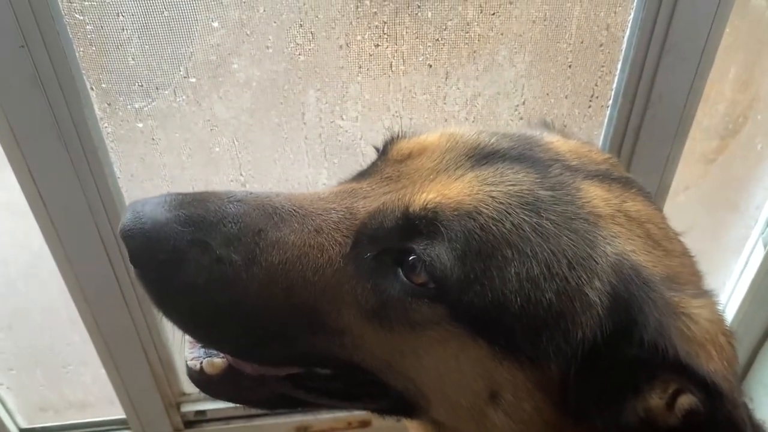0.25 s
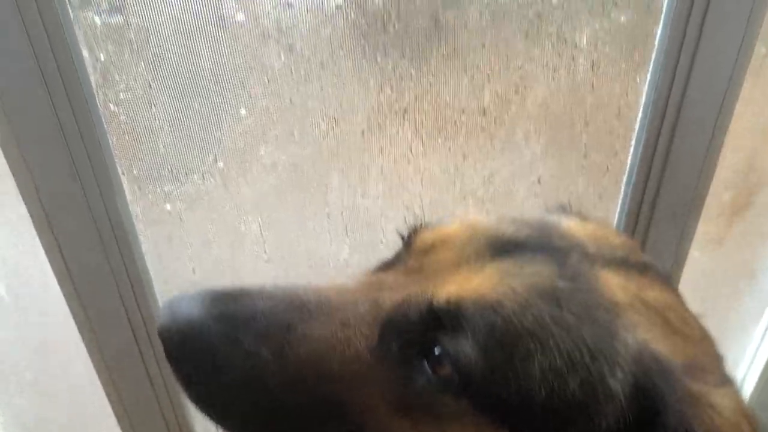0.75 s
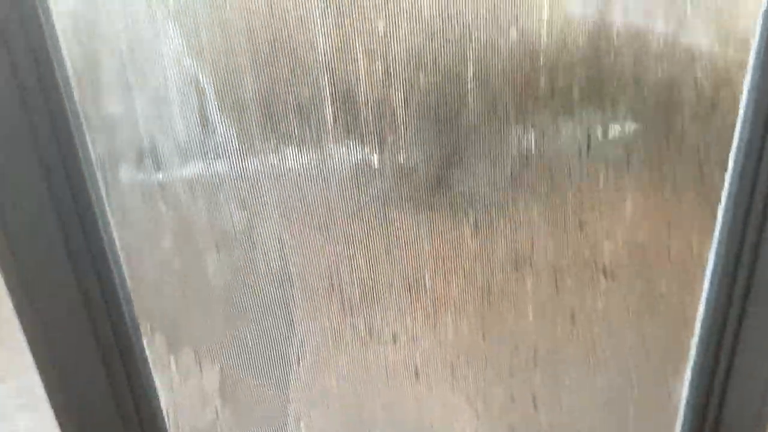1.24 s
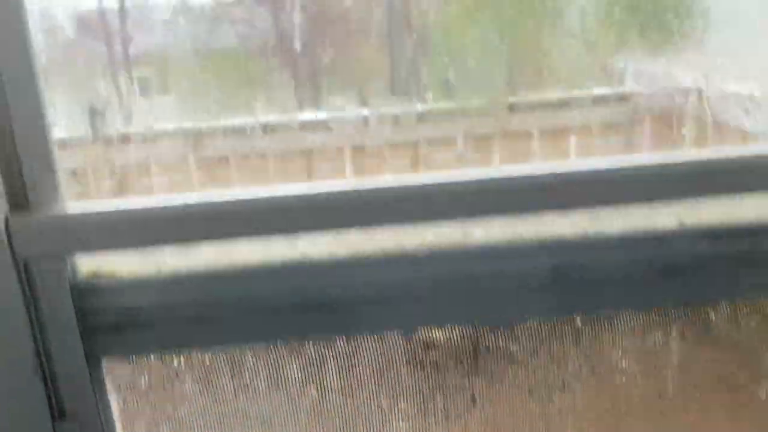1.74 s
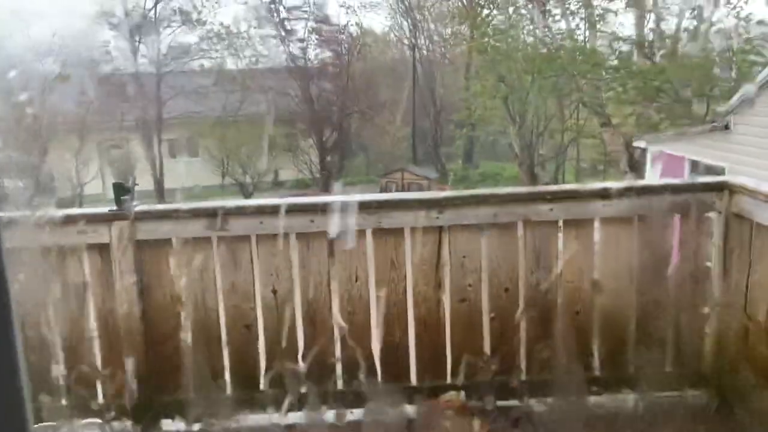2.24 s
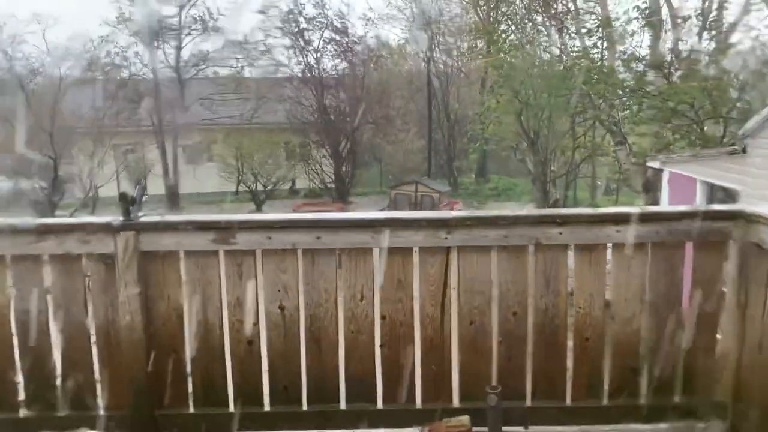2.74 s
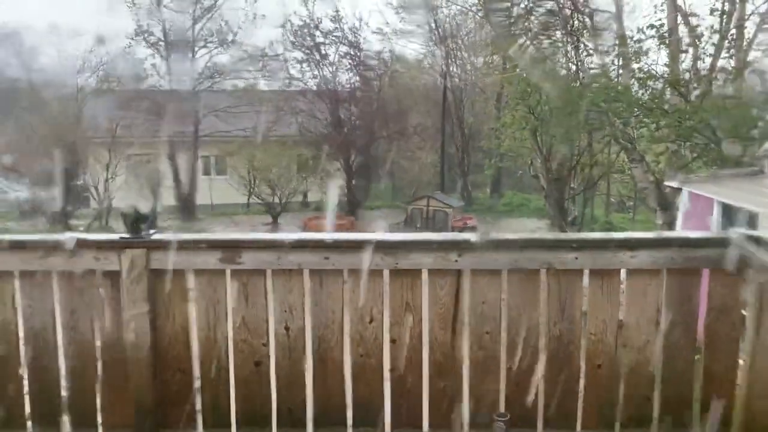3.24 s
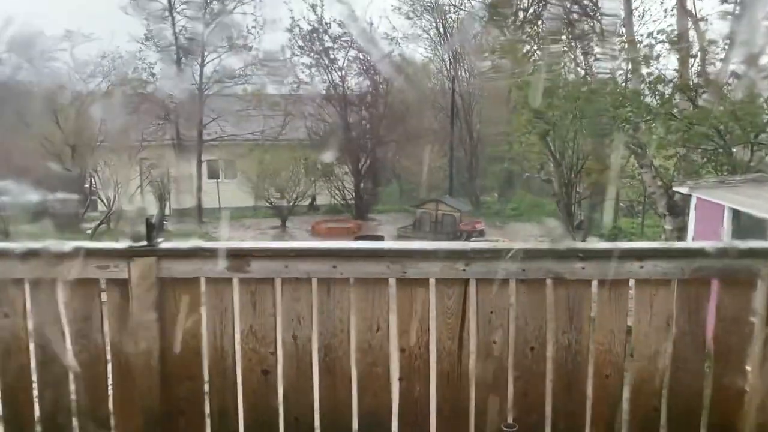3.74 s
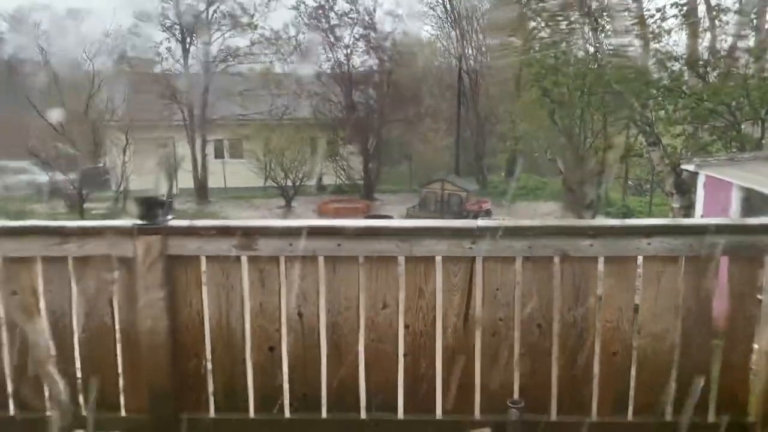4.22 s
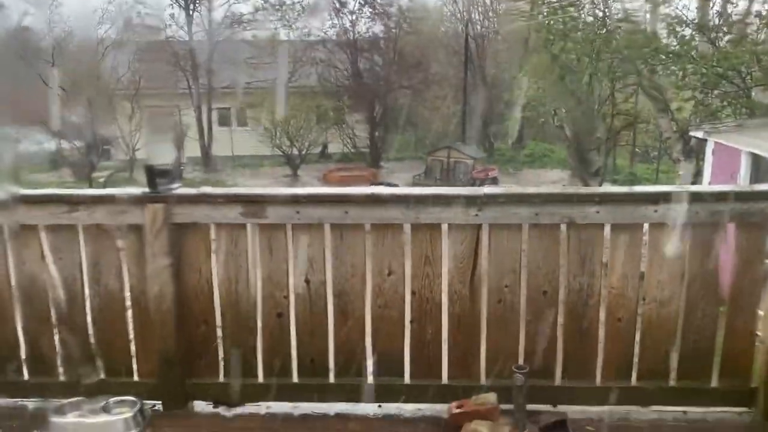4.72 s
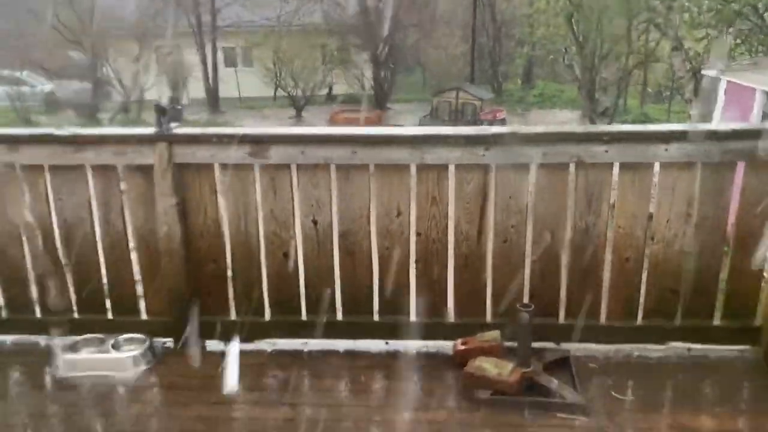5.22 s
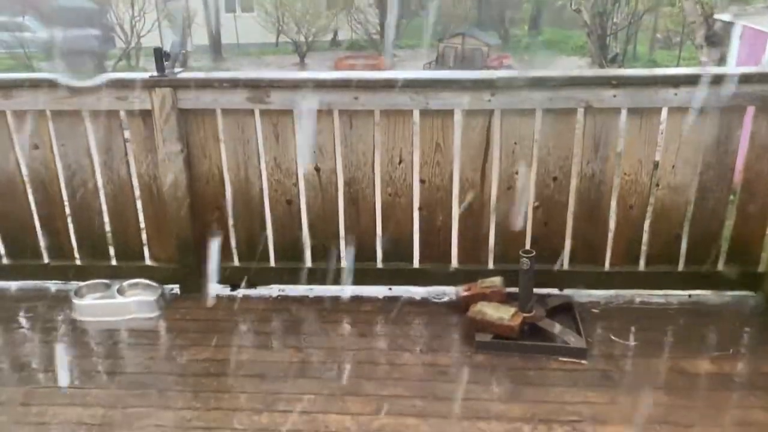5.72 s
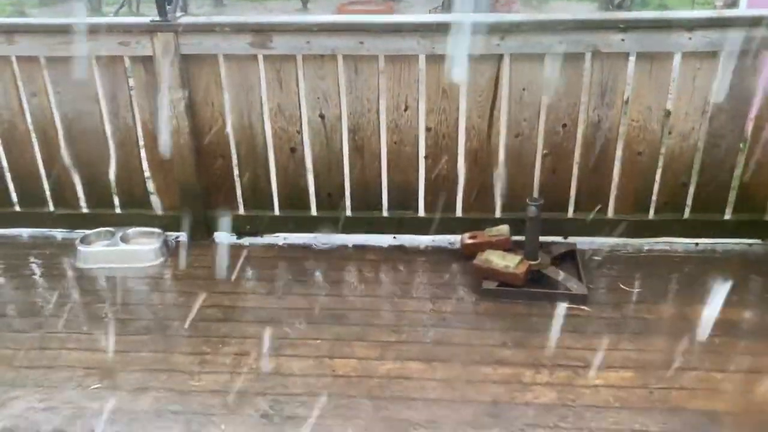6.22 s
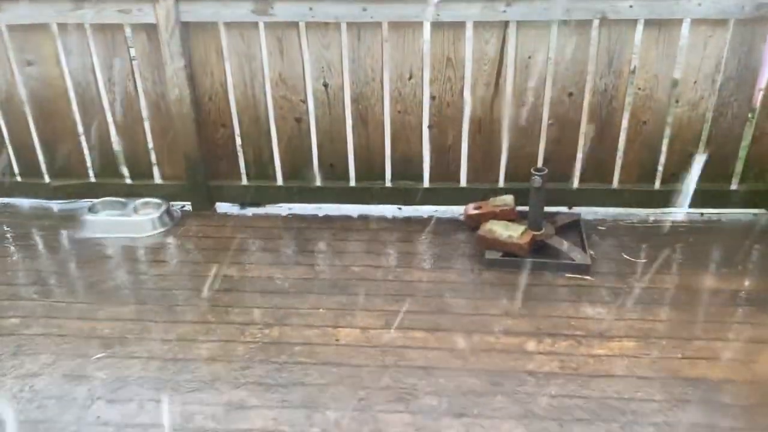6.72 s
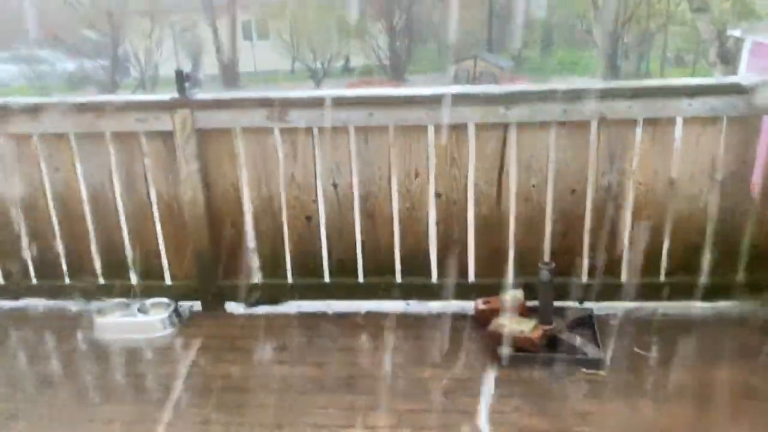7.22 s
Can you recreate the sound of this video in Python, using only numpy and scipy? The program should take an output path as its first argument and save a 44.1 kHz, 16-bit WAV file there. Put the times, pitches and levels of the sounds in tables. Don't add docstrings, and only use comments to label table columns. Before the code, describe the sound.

A heavy downpour runs throughout, a broad wet hiss with fine patter above low drumming on roof and boards, heard in stereo from a small porch room behind a screen door. At 0 s a hailstone hits close with a bright double click and icy crack. Until 2 s hail is sparse: light ticks, with snaps near 1.2 and 1.45. The rain swells around 2 s, with dull board knocks at 2.0 and 2.3 and a cluster of pellet ticks from 2.3 to 2.7. Hard raps land at 3.1 and 3.7; a faint low gust thump comes at 4.1. From 4.8 the rain is stronger and hail denser. The strongest soft thump falls at 5.5, beside a sharp crack; another crack and shorter thump follow at 6.1. A hollow wooden knock and low thump sound at 6.75, then two knocks at 7.25 and 7.34, rain still pouring at the end.

```python
import sys
import numpy as np
from scipy import signal
from scipy.fft import rfft, irfft, next_fast_len
from scipy.io import wavfile
from scipy.ndimage import uniform_filter1d, map_coordinates

SR = 44100
rng = np.random.default_rng(int(sys.argv[2]) if len(sys.argv) > 2 else 0)


def rack_gain(trim_db):
    fader = np.asarray(trim_db, float)
    return 10 ** (fader / 20)


def transcribe(u):
    v = np.clip(np.atleast_2d(u).T, -1, 1)
    q = np.round(v * 32767).astype(np.int16)
    wavfile.write(sys.argv[1], SR, q)


N = 328986

# frequency [Hz], density [dB per Hz].
HISS_SPECTRUM = [(400, -39), (700, 3.5), (1500, -2.5), (2500, 0), (5000, -6.5), (5900, -6.5), (6500, -4),
                 (7900, -2.5), (9000, -8.5), (10300, -10.5), (12300, -13), (14300, -18.5), (15700, -29),
                 (16400, -30)]
# start [s], tick level [dB], pitch [Hz].
PLANK_STONES = [(0.3517, -25, 2980), (0.786, -21, 4050), (2.1008, -19, 4570), (2.3792, -25.5, 4920),
                (2.4764, -22, 3180), (2.6, -26, 2640), (2.8545, -23.5, 2300), (3.0835, -25.5, 3700),
                (3.1772, -19, 4940), (3.2149, -17.5, 3630), (4.0678, -25.5, 2090), (4.1491, -19, 3900),
                (4.7855, -21.5, 2430), (4.7988, -20, 4050), (5.2042, -20, 4400), (5.2839, -17, 3040),
                (5.4527, -25, 4350), (5.671, -19, 3900), (5.7897, -18, 4200), (5.8805, -24, 2600),
                (5.9879, -20, 4500), (6.181, -17.5, 3480), (6.2833, -22, 4700), (6.6729, -22.5, 4100),
                (6.9288, -24, 4660), (7.0257, -24, 3600), (7.1222, -18, 2520), (7.141, -20.5, 2410),
                (7.2093, -23, 3400)]


def downpour():
    # frequency [Hz], density [dB per Hz].
    roof_spectrum = [(15, -40), (25, -21), (37, -12), (54, 2.5), (86, -6.5), (113, -1.5), (170, -12),
                     (220, -19.5), (370, -120)]
    # frequency [Hz], density [dB per Hz].
    deck_spectrum = [(76, -13.5), (130, -6), (248, -7.5), (317, -7), (355, -3.5), (388, -10.5), (420, -3),
                     (460, -11.5), (563, -8.5), (830, -28.5), (900, -19), (1170, -17), (1980, -120)]
    # time [s], level [dB].
    rain_rows = [(0.0, -39), (0.33, -41.5), (1.02, -38.5), (1.76, -38.5), (2.2, -36), (3.28, -37),
                 (3.68, -38.5), (4.84, -34), (5.15, -35.5), (5.53, -33.5), (6.09, -36), (6.25, -35),
                 (7.04, -35), (7.46, -34)]
    # time [s], level [dB].
    wind_rows = [(0.0, -35), (0.27, -39), (1.02, -36), (1.93, -37.5), (2.41, -34), (2.89, -37),
                 (3.76, -33.5), (3.93, -34.5), (5.21, -34), (5.42, -31), (5.77, -35.5), (6.23, -34),
                 (7.17, -35.5), (7.46, -33)]
    t = np.arange(N) / SR
    rain_db = np.interp(t, *np.transpose(rain_rows))
    wind_db = np.interp(t, *np.transpose(wind_rows))
    mean_rain_db = rain_db.mean()
    rain_swing_db = rain_db - mean_rain_db
    wind_swing_db = wind_db - wind_db.mean()

    roof_db = 2 + wind_db + 0.76 * wobble(5.7)
    deck_db = -32 + 0.5 * rain_swing_db + 0.3 * wind_swing_db + 0.46 * wobble(5)
    splash_db = 3 + mean_rain_db + 0.63 * rain_swing_db + 0.3 * wobble(6)
    spray_db = 2.5 + mean_rain_db + 0.82 * rain_swing_db + 1.1 * wobble(4.9)

    far_hiss = rush(HISS_SPECTRUM, patchy_db=2.5)
    hiss = far_hiss + rack_gain(-3.5) * patter(per_s=90, spread_db=4.5, t60_s=0.011)
    spray = filtered(hiss, lambda hz: np.clip((hz - 5500) / 1100, 0, 1))
    splash = hiss - spray
    roof = rush(roof_spectrum, patchy_db=0.15)
    deck = rush(deck_spectrum, patchy_db=1.0)
    return rack_gain(roof_db) * roof + rack_gain(deck_db) * deck + rack_gain(splash_db) * splash + rack_gain(spray_db) * spray


def rush(spectrum, patchy_db):
    grid = signal.stft(rng.standard_normal((2, N)), nperseg=512)[2]
    patches = rng.standard_normal(grid.shape[1:])
    patches = uniform_filter1d(patches, size=8, axis=0)
    patches = uniform_filter1d(patches, size=6, axis=1)
    pair = signal.istft(grid * rack_gain(patchy_db * unit(patches)), nperseg=512)[1][:, :N]
    return unit(filtered(pair, lambda hz: rack_gain(along(spectrum, hz))))


def patter(per_s, spread_db, t60_s):
    centres_hz = [1000, 1700, 2600, 3800, 5200, 7500, 11000]
    wet = rush(HISS_SPECTRUM, patchy_db=2.5)
    t = np.arange(2048) / SR
    puff = (1 - np.exp(-t / 0.00031)) * rack_gain(-60 * t / t60_s)
    chance, size = rng.random((2, len(centres_hz), N))
    blows = (chance < per_s / SR) * rack_gain(-spread_db * np.log(size + 0.04))
    swells = unit(signal.fftconvolve(blows, puff[None], axes=1)[:, :N])
    out = np.zeros((2, N))
    for centre_hz, swell in zip(centres_hz, swells):
        band = filtered(wet, lambda hz: np.exp(-(np.log2((hz + 1) / centre_hz) / 0.53) ** 2))
        out += swell * band
    return out


def wobble(knots_per_s):
    knots = rng.standard_normal(int(N * knots_per_s / SR) + 4)
    return map_coordinates(knots, [np.arange(N) * knots_per_s / SR])


def hail():
    # start [s], peak level [dB], pitch [Hz], t60 [s].
    knock_rows = [(1.009, -31, 751, 0.06), (1.193, -30, 1760, 0.089), (1.45, -30, 1000, 0.06),
                  (1.999, -18, 557, 0.012), (2.273, -20.5, 790, 0.031), (2.344, -20, 610, 0.041),
                  (2.765, -30, 496, 0.11), (3.119, -15, 1585, 0.048), (3.123, -21.5, 563, 0.057),
                  (3.418, -27, 1870, 0.065), (3.672, -15.5, 2010, 0.043), (4.068, -27, 1760, 0.12),
                  (4.21, -28, 2550, 0.09), (5.296, -26, 2500, 0.11), (4.849, -27, 766, 0.094),
                  (5.565, -32, 570, 0.06), (6.283, -33, 606, 0.083), (6.509, -22.5, 870, 0.036),
                  (6.746, -18, 453, 0.073), (6.753, -17.5, 650, 0.095), (6.769, -48, 468, 0.06),
                  (7.25, -20, 756, 0.046), (7.336, -15, 786, 0.048),
                  (.001, -20, 346, 0.12), (3.123, -16.5, 1490, 0.054), (6.745, -25.5, 1766, 0.16),
                     (3.119, -24, 624, .06), (6.745, -20.5, 965, 0.092), (6.755, -23, 2290, 0.057),
                     (6.762, -22, 350, 0.14), (6.796, -21, 202, .08), (7.253, -21.5, 3020, 0.035),
                     (7.338, -38, 2900, 0.036), (7.399, -19, 5500, .02)]
    s, tick_db, hz, crack_db, t60_s = stones()
    ticks = strike(s, tick_db + 1, hz, 0.66, t60_s * 0.77, porch_t60_s=0.18, porch_db=-10, ring=1)
    on_plank = np.arange(len(s)) >= len(s) - len(PLANK_STONES)
    slap_db = tick_db - 3 * on_plank
    slaps = strike(s, slap_db, 2540, 1.94, t60_s * 0.79, porch_t60_s=0.11, porch_db=-6.5, ring=0)
    cracks = strike(s, crack_db + 5.5, 8000, 0.78, t60_s * 0.7, porch_t60_s=0.13, porch_db=-17, ring=0)
    s, db, hz, t60_s = np.transpose(knock_rows)
    knocks = strike(s, db - 0.6, hz, 0.4, t60_s, porch_t60_s=0.1, porch_db=-22, ring=0.85)
    return ticks + slaps + cracks + knocks + pellets(count=420)


def stones():
    # start [s], tick level [dB], tick pitch [Hz], ice crack level [dB].
    large_stones = [(.0005, -12, 2510, -29), (.0045, -11, 5100, -7.5), (0.0142, -25, 4030, -20),
                    (.3902, -30, 3250, -21.5), (.476, -24, 3650, -30), (1.145, -28, 2930, -26),
                    (1.1943, -20.5, 3500, -17.5), (1.4505, -16.5, 2600, -17), (1.4957, -25, 5900, -13),
                    (2.5084, -18, 3160, -30), (3.1182, -15.5, 4570, -17), (3.418, -18.5, 3400, -18),
                    (3.6725, -11.5, 4060, -36), (3.8554, -21.5, 5000, -31), (4.3844, -20, 2500, -20.5),
                    (4.443, -18.5, 3850, -15.5), (5.2108, -19.5, 3630, -22), (5.3876, -14, 3700, -46),
                    (5.512, -19, 4040, -26), (5.5662, -14, 2850, -9), (5.8407, -24, 3310, -18.5),
                    (6.0795, -16.5, 2440, -5.5), (6.32, -15, 3460, -16), (6.388, -22, 3580, -24),
                    (6.4617, -20, 3500, -22), (6.4683, -28, 3600, -18.5), (6.508, -23, 4560, -15),
                    (6.7038, -21, 4300, -23), (7.2515, -29, 2980, -16), (7.337, -22, 3240, -20.5)]
    # start [s], tick level [dB], pitch [Hz].
    glass_stones = [(.3378, -31, 4020), (0.6336, -25.5, 3800), (.9225, -36, 4030), (1.0203, -29, 2980),
                    (1.332, -54, 3150), (1.3817, -28, 2250), (1.6713, -28, 2540), (2.0, -25.5, 2270),
                    (2.3125, -26.5, 3230), (2.765, -21.5, 4220), (3.509, -38, 2690), (3.6432, -28, 3950),
                    (3.923, -31, 2070), (3.9925, -27.5, 4120), (4.1606, -25.5, 2470), (4.3047, -24.5, 4050),
                    (4.8593, -21, 2400), (5.0986, -26.5, 2220), (5.469, -29, 4080), (5.6452, -24, 3440),
                    (5.9176, -24.5, 4440), (6.2704, -27, 2140), (6.5167, -21, 2830), (6.5417, -26, 2640),
                    (6.5693, -24, 3630), (6.8193, -24.5, 3140), (7.1034, -46, 2210), (7.2346, -49, 2000),
                    (7.3987, -24.5, 4660)]
    large_t60_s, glass_t60_s, plank_t60_s = 0.018, 0.016, 0.014
    glass_crack_db, plank_crack_db = -2.5, -15
    rows = [(*row, large_t60_s) for row in large_stones]
    rows += [(s, db, hz, db + glass_crack_db, glass_t60_s) for s, db, hz in glass_stones]
    rows += [(s, db, hz, db + plank_crack_db, plank_t60_s) for s, db, hz in PLANK_STONES]
    s, tick_db, hz, crack_db, t60_s = np.transpose(rows)
    return s, tick_db, hz, crack_db, t60_s * np.exp(0.2 * rng.standard_normal(len(s)))


def strike(s, level_db, hz, octaves, t60_s, porch_t60_s, porch_db, ring):
    t = np.arange(6144) / SR
    centre_hz = np.reshape(hz, (-1, 1, 1))
    decay = rack_gain(-60 * t / np.clip(t60_s, 0.004, 0.3)[:, None])
    porch = (1 - np.exp(-t / 0.0037)) * rack_gain(porch_db - 60 * t / porch_t60_s)
    shape = (1 - np.exp(-t / 0.00061)) * decay + porch
    ring_shape = (1 - np.exp(-t / 0.00007)) * decay

    noise = rng.standard_normal((len(s), 2, len(t)))
    noise = filtered(noise, lambda f: np.exp(-(np.log2((f + 1) / centre_hz) / octaves) ** 4))
    tone = np.sin(2 * np.pi * centre_hz * t) * noise.std(axis=2, keepdims=True)
    bursts = noise * shape[:, None] + ring * tone * ring_shape[:, None]
    size = rack_gain(level_db) * np.linalg.norm(shape, axis=1) / np.linalg.norm(bursts[:, 0], axis=1)
    out = np.zeros((2, N + len(t)))
    for start_s, burst in zip(s, bursts * size[:, None, None]):
        out[:, round(start_s * SR):][:, :len(t)] += burst
    return out[:, :N]


def pellets(count):
    # start [s], peak level [dB], pitch [Hz].
    rail_rows = [(0.0867, -27, 3470), (0.1136, -20, 2730), (0.4479, -21, 3060), (0.7592, -23, 2930),
                 (2.0827, -21, 4470), (2.3321, -22, 3460), (2.3614, -17, 4950), (2.3885, -22, 3910),
                 (2.4054, -22, 3750), (2.5641, -20, 4310), (2.6155, -13.5, 4600), (2.6256, -24, 2580),
                 (2.6793, -17, 3670), (2.6973, -19, 3960), (2.7386, -23, 2610), (2.9382, -22, 3930),
                 (3.5912, -32, 3240), (4.0073, -29, 3850), (4.126, -20, 3900), (4.62, -16.5, 4010),
                 (5.2659, -19, 4130), (5.6989, -15, 3500), (6.2362, -18, 4780), (6.8907, -16, 3580),
                 (7.009, -17, 3920), (7.3612, -25, 4010), (7.439, -22, 3700)]
    size, pitch = rng.standard_normal((count, 2)).T
    s, db, hz = np.transpose(rail_rows)
    s = np.append(s, rng.random(count) * N / SR)
    db = np.append(db + 3.5, -30.5 + 1.5 * size)[:, None]
    hz = np.append(hz, 3900 * 2 ** (0.26 * pitch))[:, None]
    t = np.arange(768) / SR
    phase = 2 * np.pi * rng.random((len(s), 2))
    modes = np.sin(2 * np.pi * hz * t + phase[:, :1])
    modes += 0.6 * np.sin(2 * np.pi * 1.17 * hz * t + phase[:, 1:])
    decay = rack_gain(db - 60 * t * hz / 26)
    grains = decay * (1 - np.exp(-t / 0.00056)) * modes
    at = np.round(s * SR).astype(int)[:, None] + np.arange(len(t))
    mono = np.bincount(at.ravel(), grains.ravel(), N + len(t))[:N]
    return mono * [[1], [0.5]]


def thumps():
    # start [s], peak level [dB], pitch [Hz], t60 [s].
    gust_rows = [
        (4.142, -16.5, 72.4, 0.19),
        (5.489, -7, 67, 0.21),
        (6.066, -14, 117.4, 0.15),
        (6.757, -10.5, 64.7, 0.15),
    ]
    out = np.zeros(N + SR)
    t = np.arange(SR // 2) / SR
    for s, db, hz, t60_s in gust_rows:
        swell = (1 - np.exp(-t / 0.016)) * rack_gain(db + 3.5 - 60 * t / t60_s)
        out[round(s * SR):][:len(t)] += swell * np.sin(2 * np.pi * hz * t)
    return out[:N]


def along(points, hz):
    f, v = np.transpose(points)
    return np.interp(np.log(hz + 1), np.log(f + 1), v)


def unit(x):
    return x / np.sqrt(np.mean(x ** 2) + 1e-20)


def filtered(x, response):
    m = next_fast_len(x.shape[-1] + 4096)
    return irfft(rfft(x, m) * response(np.fft.rfftfreq(m, 1 / SR)), m)[..., :x.shape[-1]]


def scene():
    return downpour() + hail() + thumps() * [[1], [0]]


def top_cut(x):
    return signal.sosfilt(signal.butter(12, 16470, fs=SR, output="sos"), x)


def record(dry):
    # frequency [Hz], share [0-1].
    shared_part = [(100, 0.99), (210, 0.9), (330, 0.38), (800, 0.21), (1800, 0.39), (2700, 0.13),
                   (4200, 0.69), (6000, 0)]
    # frequency [Hz], gain [dB].
    right_gain = [(140, 0.5), (210, 2.5), (330, -1), (800, -3), (1800, -1), (2700, -4.5), (5000, -5.5),
                  (6000, -10.5)]
    # frequency [Hz], lead [radians].
    right_lead = [(300, 0), (500, -.5), (800, -3), (1800, -3.1), (2300, -.6), (2800, -1), (4000, -.3),
                  (6300, -.5)]
    in_step_hz, port_lag_s, top_hz = 7040, 2.415e-4, 16050

    def right_mix(hz):
        treble = np.clip((hz - 6000) / 800, 0, 1)
        lag = 2 * np.pi * np.minimum((hz - in_step_hz) * port_lag_s, 2)
        lead = np.where(hz < in_step_hz, along(right_lead, hz) * (1 - treble), lag)
        share = np.clip(along(shared_part, hz) * (1 - treble) + treble, 0, 1)
        gain = rack_gain(along(right_gain, hz) * (1 - treble))
        return gain * [share * np.exp(1j * lead), np.sqrt(1 - share ** 2)]

    right = filtered(dry, right_mix).sum(axis=0)
    pair = np.clip([dry[0], right], -1, 1)
    return top_cut(filtered(pair, lambda hz: 1 / (1 + (hz / top_hz) ** 60)))


dry = scene()
out = record(dry)
transcribe(out)
```